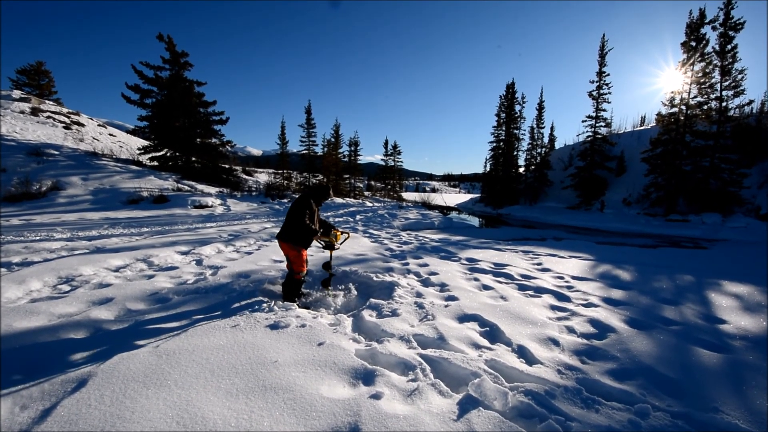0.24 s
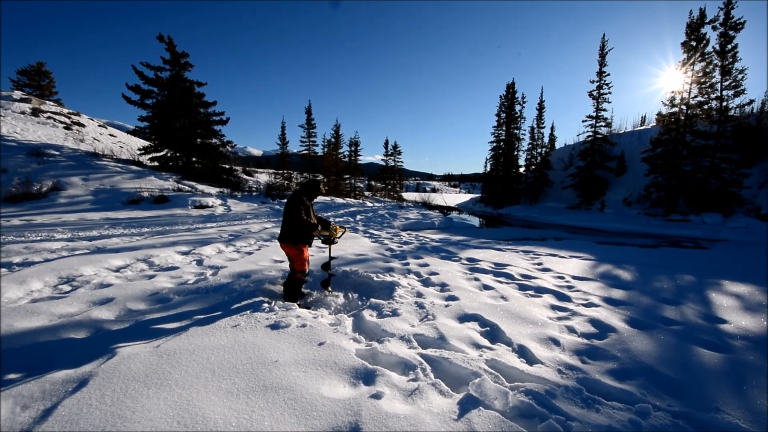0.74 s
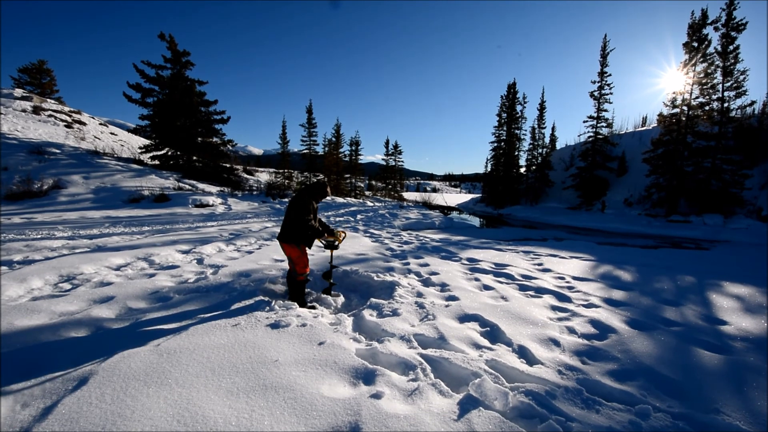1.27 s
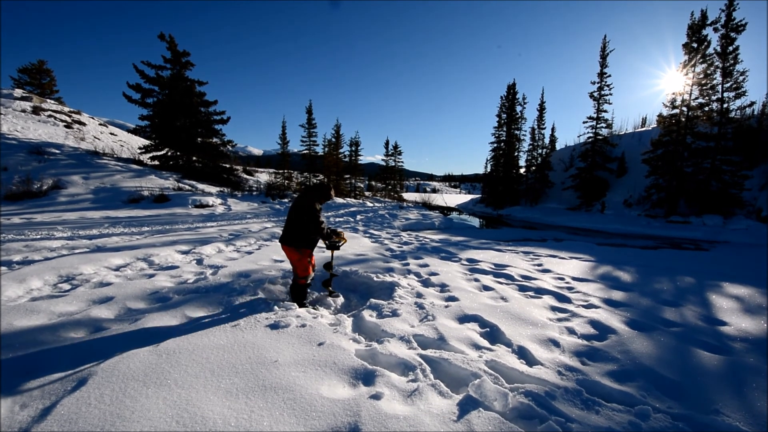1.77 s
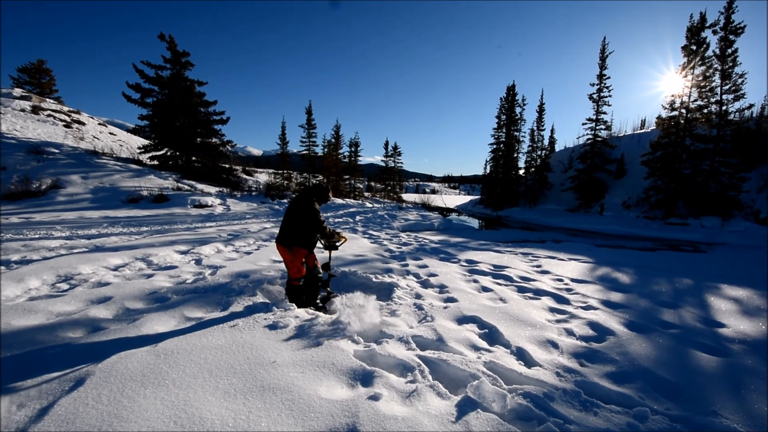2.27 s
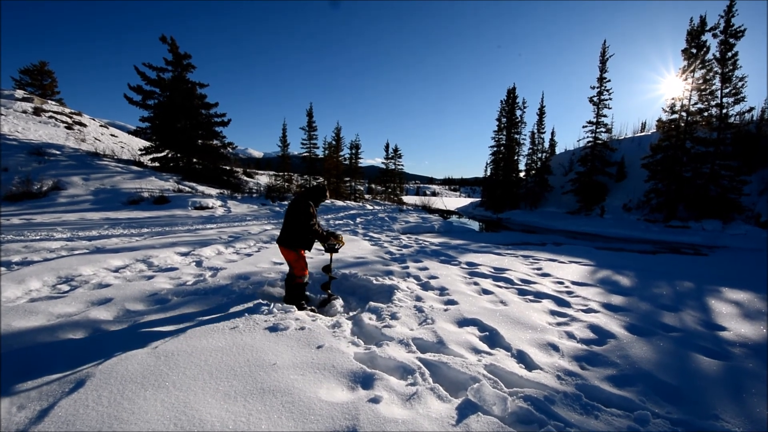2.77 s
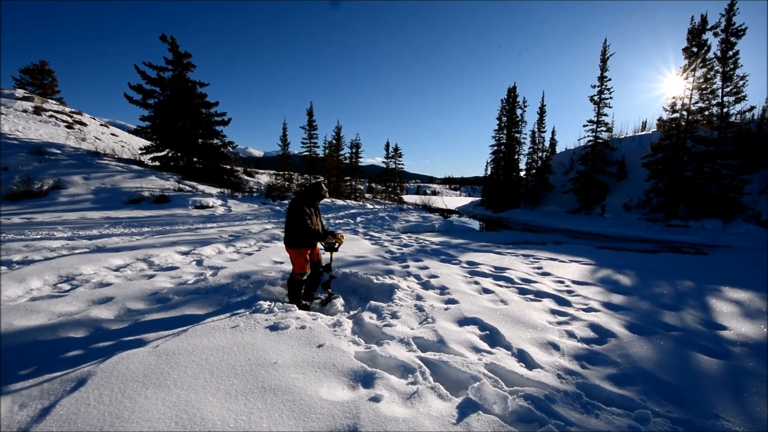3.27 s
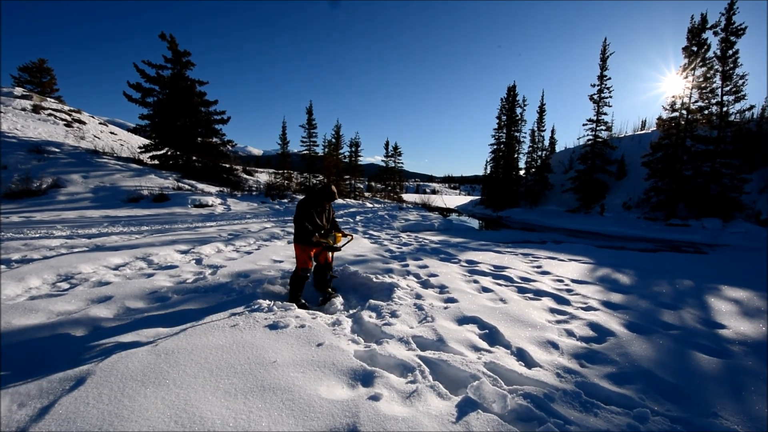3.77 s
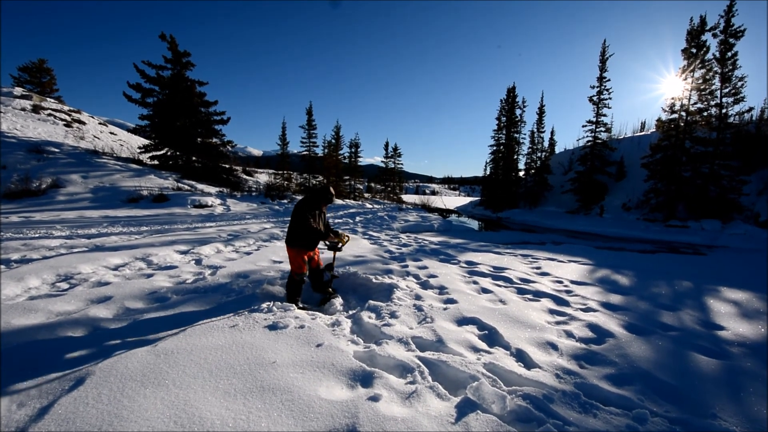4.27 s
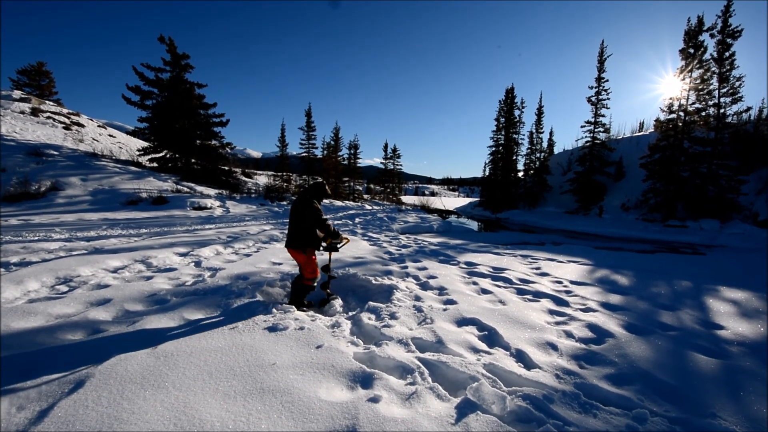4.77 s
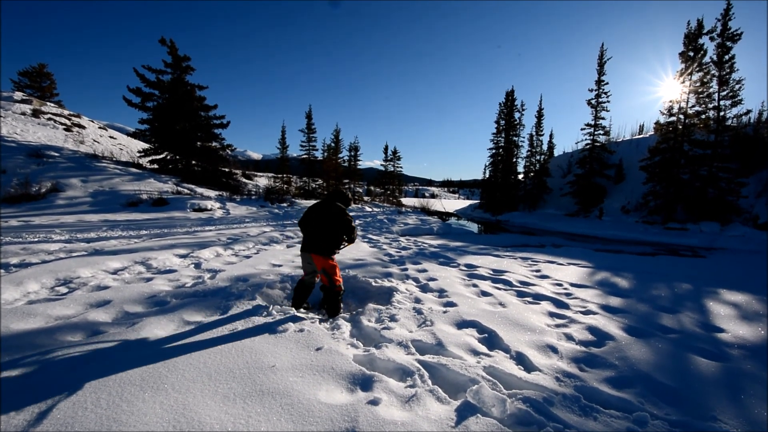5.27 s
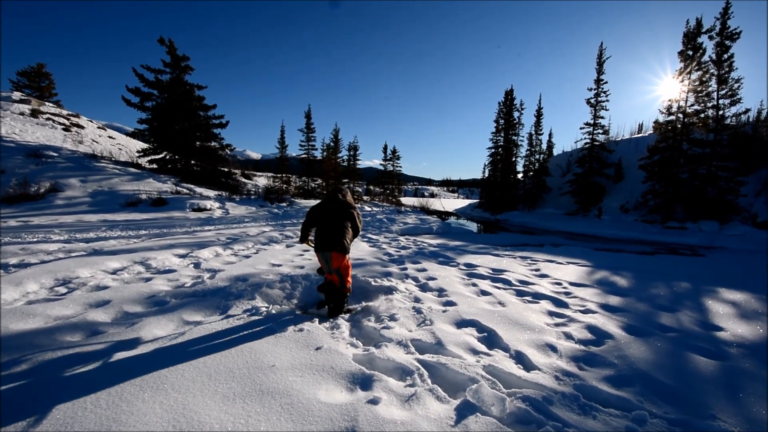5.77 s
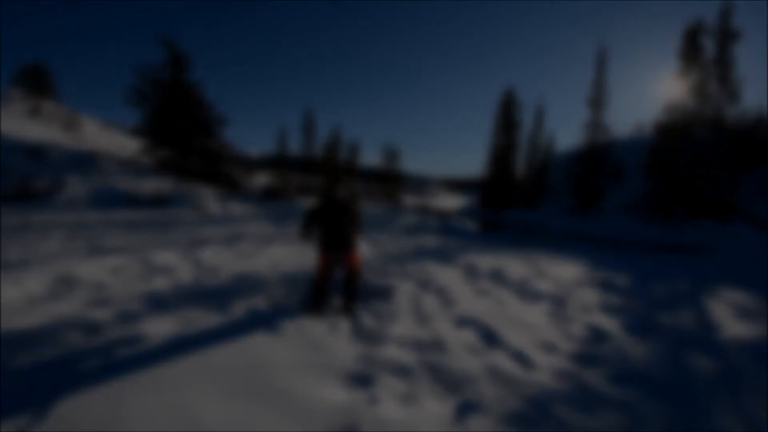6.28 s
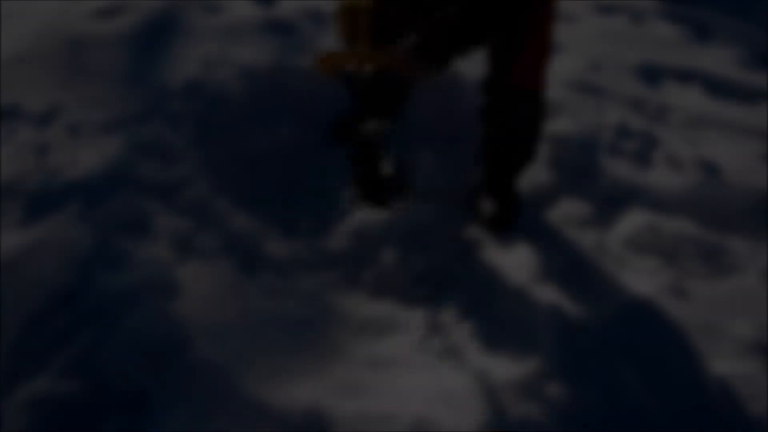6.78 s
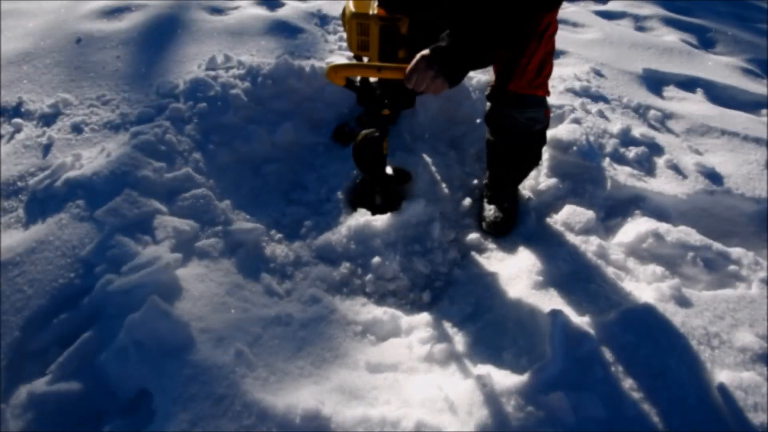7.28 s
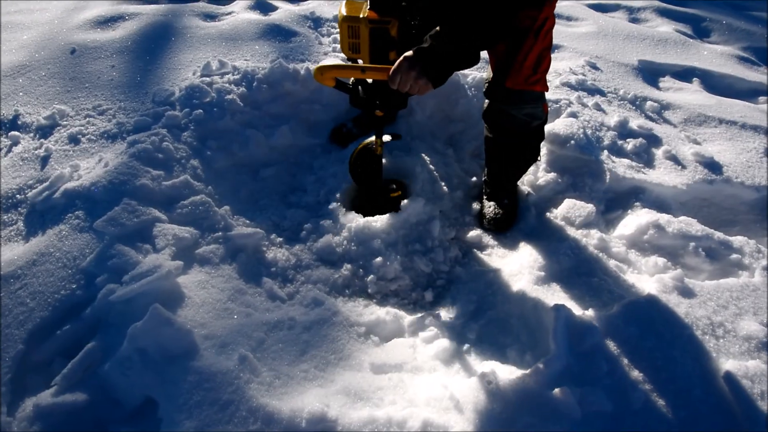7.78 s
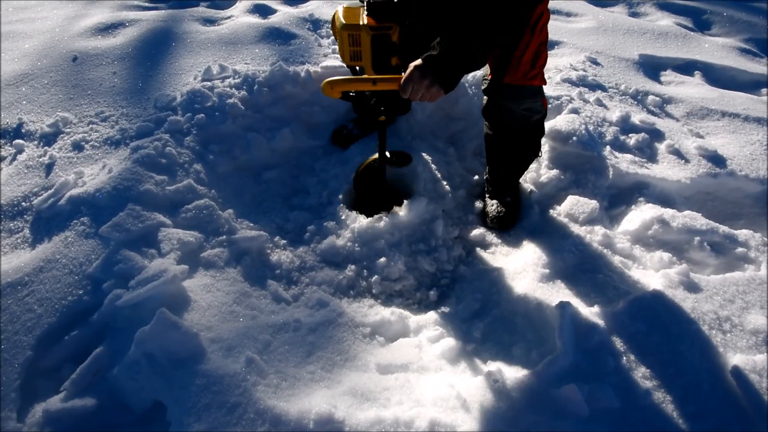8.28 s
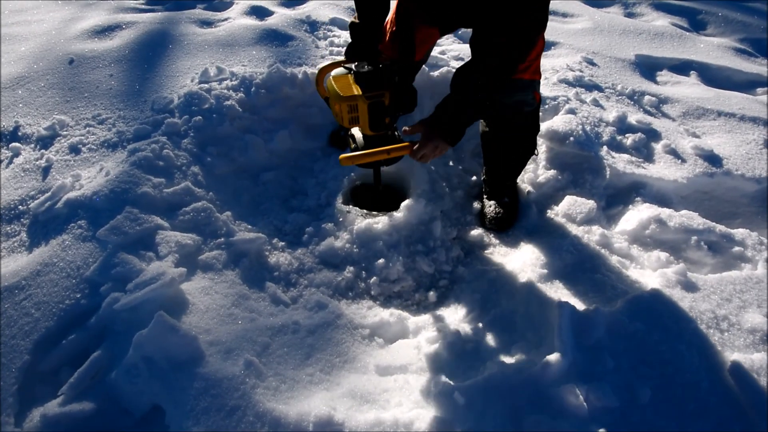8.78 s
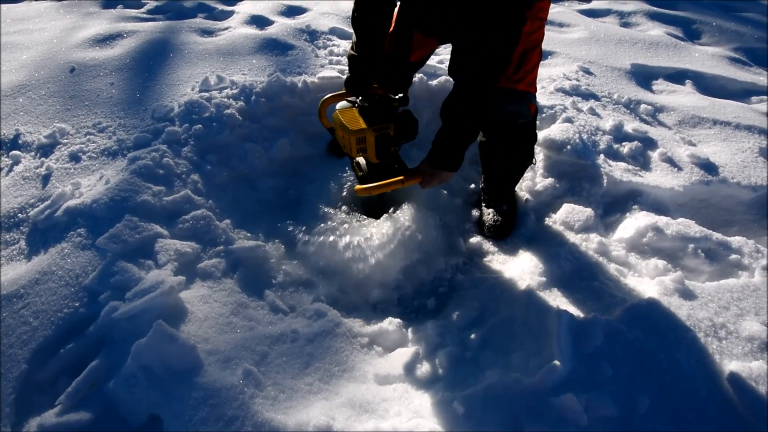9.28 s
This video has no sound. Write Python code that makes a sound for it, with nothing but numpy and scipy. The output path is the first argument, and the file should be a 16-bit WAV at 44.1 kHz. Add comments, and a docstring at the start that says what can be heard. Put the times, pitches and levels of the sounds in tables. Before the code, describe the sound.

A small two-stroke ice auger runs some metres away on a frozen lake, with no echo. It revs to a peak at about 0.3 seconds, then winds down, its exhaust and gear whine falling. From 1.3 seconds it idles unevenly with sharp irregular pops and a metallic knock; a loose cover clanks between 2.6 and 5 seconds. Around 5 seconds the sound turns duller and quieter. At about 6 seconds it dips and fades back in from close by, with hard pops, a thin clutch ring and short bursts of chipping ice. At 6.6 seconds the throttle opens and the engine buzzes loudly under load while the blade scrapes with a hiss. The pitch sags until 8 seconds, recovers, and climbs to a high rev near 8.7 seconds. The engine then runs down, with a few pops and ice chips around 9.5 seconds.

```python
"""A two-stroke ice auger on a frozen lake, where snow gives no echo. First, some metres away, it revs and
runs down, exhaust pulses and gear whine falling with the crank speed. It then idles, firing every few
turns, while piston slap rings the cylinder and a loose cover clanks; the driller steps in front and
screens it. Next, from close by, the slipping clutch rings and the blade scrapes and chips the ice as it
bores under load. Last, the engine revs free and runs down."""
import sys
import numpy as np
from scipy import signal
from scipy.fft import rfft, irfft
from scipy.io import wavfile
from scipy.ndimage import uniform_filter1d, map_coordinates

SR = 44100
rng = np.random.default_rng(int(sys.argv[2]) if len(sys.argv) > 2 else 0)


def file_out(sig):
    """Save sig as 16-bit WAV at sys.argv[1]."""
    # one column per channel
    cols = np.atleast_2d(sig).T
    # limit, then scale
    lim = np.clip(cols, -1, 1)
    pcm = np.round(lim * 32767).astype(np.int16)
    wavfile.write(sys.argv[1], SR, pcm)


N = 420273
TIME_S = np.arange(N) / SR


def undb(db):
    """Amplitude ratio of a level in decibels."""
    return 10 ** (np.asarray(db) / 20)


def unit(x):
    """Normalisation to rms 1."""
    return x / np.sqrt(np.mean(x ** 2))


def curve(table):
    """Linear interpolation of (time_s, value) rows at every sample."""
    return np.interp(TIME_S, *np.transpose(table))


def walk(rate_hz):
    """Low-pass random fluctuation with a spread near 1."""
    hold = int(SR / rate_hz)
    steps = np.repeat(rng.standard_normal(N // hold + 1), hold)
    return 1.3 * uniform_filter1d(uniform_filter1d(steps, hold), hold)[:N]


def colour(x, outline, size=4096):
    """Minimum-phase filter through (frequency_hz, gain_db) rows, by folding the cepstrum."""
    hz, db = np.transpose(outline)
    bins_hz = np.maximum(np.fft.rfftfreq(size, 1 / SR), 1)
    cepstrum = irfft(np.log(undb(np.interp(np.log(bins_hz), np.log(hz), db))))
    cepstrum[1:size // 2] *= 2
    cepstrum[size // 2 + 1:] = 0
    return signal.fftconvolve(x, irfft(np.exp(rfft(cepstrum))))[:N]


def ring(x, modes):
    """Superposition of damped resonances, given as (pitch_hz, width_hz, gain_db) rows."""
    return sum(undb(db) * signal.lfilter(*signal.iirpeak(hz, hz / width, fs=SR), x)
               for hz, width, db in modes)


def steep_ring(x, hz, width, db):
    """Two equal resonators in cascade give steeper skirts; the gain applies once."""
    return ring(ring(x, [(hz, width, 0)]), [(hz, width, db)])


def clicks(times, sizes):
    """Impulse train, each impulse shared between two samples."""
    place = np.clip(times * SR, 0, N + 1)
    i = place.astype(int)
    before = np.bincount(i, sizes * (1 - place + i), N + 3)
    after = np.bincount(i + 1, sizes * (place - i), N + 3)
    return (before + after)[:N]


def fade(x, decay_s):
    """Exponential decay after every impulse."""
    return signal.lfilter([1], [1, -np.exp(-1 / (decay_s * SR))], x)


def kicks(fired, decay_s):
    """Impulse response of the crank: each lone firing gives a jolt that dies away."""
    return uniform_filter1d(fade(clicks(fired, 1), decay_s), size=100)


def strokes(turns, scatter_db, jitter_s, angle=0):
    """Quasi-periodic impacts: one a turn at the given crank angle, uneven in size and time."""
    timing, strength = rng.standard_normal((1000, 2)).T
    never_s = 2 * N / SR
    times = np.interp(np.arange(1000) + angle, turns, TIME_S, left=never_s, right=never_s)
    return clicks(times + jitter_s * timing, undb(scatter_db * strength))


def rattle(turns, hz, jitter_s, count):
    """Impacts across clearances: loose parts strike at their own slowly creeping crank angles."""
    angles = (np.arange(count) + rng.random(count)) / count
    creep = .01 * np.cumsum(rng.standard_normal((count, 1000)), axis=1)
    blows = sum(rng.choice([-1, 1]) * strokes(turns, 1.5, jitter_s, angle)
                for angle in angles[:, None] + creep)
    return unit(blows / np.sqrt(hz))


def throb(turns, hz, decay_s, floor, scatter_db, angle=0):
    """Amplitude modulation of mean power 1: one burst a turn, running together at speed."""
    bursts = fade(strokes(turns, scatter_db, .0012, angle), decay_s) + floor * (hz / 60) ** 2
    bursts = uniform_filter1d(bursts, size=90)
    return bursts / np.sqrt(uniform_filter1d(bursts ** 2, size=8000))


CLOSE_S, FADE_IN_S = 5.9, .32  # the listening point moves close, and the engine fades in
# Crank speed, heard from afar and from close by: time_s, speed_hz
FAR_SPEED = [(0.0, 99.7), (0.14, 115.6), (0.28, 124.4), (0.46, 114.7), (0.78, 91.16), (1.22, 70.54),
             (1.43, 64.23), (2.12, 61.5), (2.21, 59.2), (3.23, 54.85), (4.43, 56.65), (4.64, 52.3),
             (5.2, 54.05), (5.49, 50.5), (5.89, 49.4)]
NEAR_SPEED = [(5.9, 90.9), (6.18, 67.6), (6.24, 73.6), (6.62, 73.3), (6.76, 96.7), (6.9, 99.4), (7.0, 93.6),
              (7.08, 93.4), (7.18, 89.4), (7.3, 87.5), (7.34, 88.6), (7.42, 86.6), (7.48, 87.5),
              (7.78, 76.5), (7.96, 75.3), (8.06, 77.3), (8.22, 86.5), (8.36, 85.6), (8.5, 104.0),
              (8.6, 115.8), (8.7, 122.6), (8.79, 123.4), (8.9, 110.3), (9.12, 87.3), (9.4, 67.6),
              (9.53, 65.2)]
def crank_speed():
    """Rotation rate sets the fundamental; close by, the load of the biting blade makes it wobble."""
    wobble = 1 + .008 * walk(13)
    return np.where(TIME_S < CLOSE_S, curve(FAR_SPEED), curve(NEAR_SPEED) * wobble)


def crank_angle(hz, fired):
    """Flywheel inertia: the crank leaps at each lone firing, then coasts. Angle in turns."""
    jolt = kicks(fired, .092)
    lurching_hz = hz * (1 + .045 * (jolt - uniform_filter1d(jolt, size=6000)))
    turns = np.cumsum(lurching_hz) / SR
    lead = np.unwrap(np.interp(fired, TIME_S, turns) % 1, period=1)
    return turns - np.interp(TIME_S, fired, lead)  # each firing falls at the top of a stroke


# Squeezes of the throttle: open_s, shut_s, opening_fraction, decay_s
SQUEEZES = [(-0.3, 0.04, 1, .11), (5.9, 6.15, .55, .1), (6.62, 8.73, 1, .03)]
def throttle_opening(attack_s=.03):
    """First-order lag: the opening rises and falls exponentially with each squeeze."""
    return np.max([opening * (1 - np.exp(-np.maximum(TIME_S - open_s, 0) / attack_s))
                   * np.exp(-np.maximum(TIME_S - shut_s, 0) / decay_s)
                   for open_s, shut_s, opening, decay_s in SQUEEZES], axis=0)


# Each *_LEVEL row below gives a part's level when idling afar, then what each condition adds:
# idle_db, clutch_db, per_octave_db, throttle_db, close_db, screened_db
def level_law(hz, throttle, clutch_hz=64.14):
    """Gains multiply, so decibels add: returns the rule that turns a *_LEVEL row into dB over time."""
    engaged = .5 + .5 * np.tanh((hz - clutch_hz) / 2.64)
    octaves = np.log2(np.maximum(hz / clutch_hz, 1))
    close = TIME_S >= CLOSE_S
    screened = np.clip(.5 + (TIME_S - 4.985) / .89, 0, 1) * ~close  # the driller steps in front
    fade_db = -14.5 * close * np.clip(1 - (TIME_S - CLOSE_S) / FADE_IN_S, 0, 1)
    conditions = np.array([np.ones(N), engaged, octaves, throttle, close, screened])
    return lambda row: np.dot(row, conditions) + fade_db


NOTE_LEVEL = (-32, 0, -3, 0, -4.5, 0)
# Muffler response under throttle: frequency_hz, gain_db
DRIVEN_MUFFLER = [(170, -26), (225, -3), (270, 1), (330, -1), (470, 3), (570, -12), (700, -15)]
def exhaust_note(turns, hz, throttle, level, lug_hz=80):
    """Periodic firing gives a harmonic series: the third leads, higher ones swell as the engine lugs."""
    uneven = turns + .007 * walk(70)
    lugging_db = 15 * np.log2(lug_hz / hz)
    note, power = 0, 0
    for k in range(2, 11):
        muffler_db = np.interp(k * hz, *np.transpose(DRIVEN_MUFFLER))
        gain = undb(muffler_db + 4 * (k == 3) + lugging_db * (k > 3))
        note += gain * undb(2 * walk(25)) * np.sin(2 * np.pi * (k * uneven + rng.random()))
        power += gain ** 2 / 2
    return note / np.sqrt(power) * throttle * undb(level(NOTE_LEVEL))


SOFT_FIRING_LEVEL = (-36.5, -25, 0, 2, 5, -10)
# The hardest lone firings with the throttle shut: start_s, level_db
HARD_IGNITIONS = [(1.2988, -23), (1.359, -31), (1.8979, -28), (2.0102, -27), (2.0903, -27.5), (2.4455, -34),
                  (2.7274, -29), (2.7958, -27), (2.8661, -28), (2.9912, -29), (3.1356, -28.5),
                  (3.208, -28.5), (3.2807, -33), (3.4445, -35), (3.6258, -28.5), (3.8081, -28),
                  (3.935, -27.5), (4.1344, -24.5), (4.2984, -26.5), (4.3886, -28.5), (4.629, -29),
                  (5.1185, -29), (5.2127, -31.5), (5.307, -36.5), (5.401, -42), (5.479, -46), (5.615, -41),
                  (5.692, -39), (5.771, -42), (6.2153, -29), (6.284, -17), (6.3978, -17.5), (6.464, -16),
                  (6.54, -18), (9.3821, -18), (9.4409, -21), (9.5011, -16.5)]
def lone_firings(hz, level, every_turns=4.3, below_hz=66, scatter_db=6.5):
    """Intermittent combustion: at low speed soft firings fall between hard ones. Times and levels."""
    soft_db = level(SOFT_FIRING_LEVEL)
    turns = np.cumsum(hz) / SR
    hard_turns = np.interp(np.array(HARD_IGNITIONS)[:, 0], TIME_S, turns)
    chance = iter(rng.standard_normal((300, 2)))
    rows = list(HARD_IGNITIONS)
    for start, end in zip(hard_turns, hard_turns[1:]):
        gap = round(end - start)
        count = max(round(gap / every_turns), 1)
        for turn in np.linspace(0, gap, count, endpoint=False)[1:]:
            timing, strength = next(chance)
            i = np.searchsorted(turns, start + (end - start) * round(turn + .35 * timing) / gap)
            if hz[i] < below_hz:
                rows.append((TIME_S[i], soft_db[i] + scatter_db * strength))
    return np.array(sorted(rows)).T


# Spectrum of a firing's crack: frequency_hz, gain_db
CRACK_SPECTRUM = [(30, -66), (300, 9), (900, 1), (2300, 10.5), (4500, -2.5), (8500, 2.5), (15000, -5)]
def firing_cracks(fired, fired_db):
    """A brief pressure pulse has a broad spectrum: each lone firing is a sharp burst of noise."""
    bursts = uniform_filter1d(fade(clicks(fired + .0006, undb(fired_db)), .0042), size=70)
    return undb(-2.5) * colour(bursts * rng.standard_normal(N), CRACK_SPECTRUM)


THUD_LEVEL = (-48, 0, 0, 0, 14, 8)
# Broad resonance of the muffler: pitch_hz, width_hz, gain_db
MUFFLER_MODES = [(450, 270, 0)]
def firing_thuds(fired, level):
    """Heavy damping: the muffler answers each lone firing with a dull thud."""
    thuds = ring(ring(clicks(fired, 1), MUFFLER_MODES), MUFFLER_MODES)
    return thuds / np.max(np.abs(thuds)) * undb(level(THUD_LEVEL))


PUFF_LEVEL, GROWL_LEVEL = (-52, 1.5, -11.5, -7, -10.5, -2.5), (-76.5, 14.5, -24, -1, 26.5, 13)
# Muffler response to puffs: frequency_hz, gain_db
PUFF_SPECTRUM = [(25, -47), (58, -9.5), (110, -5.5), (170, -14.5), (225, -3.5), (280, -2), (330, 6.5),
                 (390, -3), (480, -1.5), (900, -24.5), (2000, -71)]
# Resonances of the outlet: pitch_hz, width_hz, gain_db
GROWL_MODES = [(215, 60, -7), (345, 110, 0), (445, 110, -1)]
def exhaust_puffs(turns, hz, level):
    """Source and filter: the piston pumps a puff a turn through the muffler, and the outlet growls."""
    puffs = unit(strokes(turns, 1.5, .00015) / np.sqrt(hz)) + .7 * rng.standard_normal(N)
    muffled = unit(colour(puffs, PUFF_SPECTRUM))
    growl = unit(sum(steep_ring(puffs, *mode) for mode in GROWL_MODES))
    return muffled * undb(level(PUFF_LEVEL)) + growl * undb(level(GROWL_LEVEL))


KNOCK_LEVEL = (-35.4, -7.5, -14, -6, -12, -20)
# Wavering of the knock: time_s, gain_db
KNOCK_WAVER = [(1.4, 3.5), (2.6, -3.5), (3.3, -3), (3.8, -10.5), (4.2, -3.5), (4.7, -3.5), (4.95, 6),
               (5.2, 5.5), (5.4, 0)]
# Cylinder resonances, passed twice: pitch_hz, width_hz, gain_per_pass_db
KNOCK_MODES = [(1372, 115, 10), (1715, 90, 6.5), (2340, 300, -9)]
def piston_knock(turns, level):
    """Impact excitation: the piston slaps once a turn; the ring swells as it spreads into the fins."""
    slap = strokes(turns, scatter_db=.8, jitter_s=.00003)
    scuff = fade(slap, .002) * rng.standard_normal(N)
    blow = unit(slap) + .25 * unit(scuff)
    cylinder = sum(ring(ring(blow, [mode]), [mode]) for mode in KNOCK_MODES)
    return unit(cylinder) * undb(level(KNOCK_LEVEL) + curve(KNOCK_WAVER))


PINION_TEETH, GEAR_LEVEL = 8, (-54.5, 6, 4, 7, 9, -12)
# Response of the gear case: frequency_hz, gain_db
GEARCASE_SPECTRUM = [(450, -5), (610, 1), (850, -7), (980, 2), (1080, -7), (1220, 3), (1500, 1),
                     (1800, -10), (2120, 3), (2480, -2), (3050, -7), (3300, -20)]
def gear_whine(turns, level):
    """Tooth-mesh harmonics, modulated in amplitude by tooth load and in phase by backlash."""
    mesh = PINION_TEETH * turns + .02 * walk(90) + .09 * walk(22)
    whine = 0
    for k in range(1, 5):
        backlash = (.05 + .035 * k) * walk(150)
        load = undb(2.7 * walk(16) + 3.3 * walk(150))
        whine += load * np.sin(2 * np.pi * (k * mesh + backlash + rng.random()))
    swell = 1 + .55 * np.cos(2 * np.pi * turns + 1)
    return unit(colour(whine * swell, GEARCASE_SPECTRUM)) * undb(level(GEAR_LEVEL))


HOUSING_LEVEL, CLATTER_LEVEL = (-50, 16.5, -1.5, .5, 0, -5.5), (-40, 9.5, 2.5, 0, -.5, -10)
# Responses of the housing and of the thin metal covers: frequency_hz, gain_db
HOUSING_SPECTRUM = [(30, -35), (150, -21), (250, -11), (450, -11.5), (620, -4), (1000, 0.5), (1300, 0.5),
                    (2200, -15.5)]
CLATTER_SPECTRUM = [(60, -109), (600, -29), (1000, -10.5), (1300, 0.5), (1900, -.5), (2300, 2.5),
                    (2800, -3.5), (3300, -5), (3900, -8.5), (4700, -18), (7000, -57)]
def casing_clatter(turns, hz, level):
    """Structure-borne sound: small blows and gas noise shake the housing and its covers."""
    low = rattle(turns, hz, jitter_s=.00029, count=14) + rng.standard_normal(N)
    low *= throb(turns, hz, decay_s=.02, floor=.8, scatter_db=3.5)
    high = rattle(turns, hz, jitter_s=.00004, count=24) + .8 * rng.standard_normal(N)
    high *= throb(turns, hz, decay_s=.0036, floor=.33, scatter_db=1.5)
    housing = unit(colour(low, HOUSING_SPECTRUM)) * undb(level(HOUSING_LEVEL))
    covers = unit(colour(high, CLATTER_SPECTRUM)) * undb(level(CLATTER_LEVEL))
    return housing + covers


HISS_LEVEL = (-52.5, 11.5, -1.5, 3, 5.5, -10)
# Wavering of the hiss: time_s, gain_db
HISS_WAVER = [(0, -2), (.3, 5), (.9, -2), (1.6, 4), (3.3, 0.5), (3.9, 8.5), (4.7, -2.5), (5.2, 2), (5.9, 1)]
# Spectrum of the hiss, shared by the ice chips: frequency_hz, gain_db
HISS_SPECTRUM = [(2350, -13.5), (4000, -3), (7480, -2), (10100, -1), (11300, -7.5), (13200, -4),
                 (15500, -8.5)]
def intake_hiss(turns, hz, fired, level):
    """Flow noise: the intake hisses ahead of each stroke and surges with jolts while the clutch slips."""
    breaths = throb(turns, hz, decay_s=.0039, floor=.33, scatter_db=2, angle=-.32)
    gas = rng.standard_normal(N) * breaths * undb(.99 * walk(300))
    slipping = np.exp(-((hz - 69) / 7) ** 2)
    surge = 1 + slipping * (1.2 * kicks(fired, .06) - .4)
    return unit(colour(gas, HISS_SPECTRUM)) * surge * undb(level(HISS_LEVEL) + curve(HISS_WAVER))


SING_LEVEL = (-43, 7, 0, -12, 3, 0)
# Drill resonances, passed twice: pitch_hz, width_hz, gain_per_pass_db
SING_MODES = [(570, 130, -3), (1530, 190, 3)]
def coasting_drill(turns, hz, level, sing_hz=86, spread_hz=9.5):
    """Swept resonance: slack teeth chatter, and their whine glides through the modes of the drill."""
    teeth = sum(np.sin(2 * np.pi * (k * PINION_TEETH * turns + .17 * walk(110))) for k in (1, 2))
    chatter = teeth + 3 * rattle(turns, hz, jitter_s=.00004, count=20)
    slack = np.exp(-((hz - sing_hz) / spread_hz) ** 2 / 2)
    return slack * unit(ring(ring(chatter, SING_MODES), SING_MODES)) * undb(level(SING_LEVEL))


GRAZE_HZ, GRAZE_SPREAD_HZ = 70.7, 7.2  # crank speeds at which the shoes graze the drum
SHOE_LEVEL = (-43, 5, 10, 1, 5.5, -8)
# Resonances of the clutch drum: pitch_hz, width_hz, gain_db
DRUM_MODES = [(6900, 1000, -1), (10480, 680, 1.5), (9500, 7000, -4.5)]
def clutch_shoes(turns, hz, fired, level):
    """Friction excitation: near engagement each jolt throws the shoes against the drum, which rings."""
    touch = np.exp(-((hz - GRAZE_HZ) / GRAZE_SPREAD_HZ) ** 2)
    pressure = .2 + 1.2 * kicks(fired, .043)
    graze = rng.standard_normal(N) * throb(turns, hz, decay_s=.004, floor=.12, scatter_db=2)
    drum = sum(steep_ring(graze, *mode) * undb(3 * walk(30)) for mode in DRUM_MODES)
    return touch * pressure * unit(drum) * undb(level(SHOE_LEVEL))


# Resonances of the blade: pitch_hz, width_hz, gain_db
SCRAPE_MODES = [(4990, 620, 5), (6140, 450, 7), (7340, 420, 6), (9550, 420, -3)]
def blade_scrape(hz, far_db=-52, closer_db=9.5):
    """Sliding friction on ice excites the blade's modes, which drift and swell as the contact shifts."""
    friction = rng.standard_normal(N) * undb(3 * walk(400))
    blade = 0
    for mode in SCRAPE_MODES:
        drift = np.arange(N) + np.cumsum(.018 * walk(4))
        ringing = map_coordinates(steep_ring(friction, *mode), [drift], mode="mirror")
        blade += ringing * undb(3.5 * walk(5))
    turning = .5 + .5 * np.tanh((hz - GRAZE_HZ) / GRAZE_SPREAD_HZ)
    closeness = np.clip((TIME_S - CLOSE_S) / FADE_IN_S, 0, 1)
    return unit(blade) * turning * undb(far_db + closer_db * closeness)


# The blade catches in the ice: start_s, level_db
BLADE_CATCHES = [(6.298, -25), (6.484, -24), (6.498, -19), (6.555, -21), (6.64, -21), (9.353, -26),
                 (9.471, -27)]
def ice_chips():
    """Brittle fracture: each catch chips the ice in a short broadband burst."""
    times, db = np.transpose(BLADE_CATCHES)
    bursts = uniform_filter1d(fade(clicks(times, undb(db)), decay_s=.008), size=90)
    return bursts * unit(colour(rng.standard_normal(N), HISS_SPECTRUM))


# Blows of the loose cover at idle: start_s, level_db
COVER_BLOWS = [(2.603, -36), (2.726, -30), (2.936, -33), (3.316, -31), (3.352, -35), (3.388, -28),
               (3.445, -32), (3.479, -31), (3.499, -27), (3.553, -32), (3.935, -39), (4.297, -28),
               (4.388, -36), (4.571, -32.5), (4.708, -43), (4.95, -38)]
# Resonances of the cover: pitch_hz, width_hz, gain_db
CLANK_MODES = [(1760, 120, 9), (2030, 220, -10), (2420, 160, 10.5), (2760, 260, -11), (3280, 220, -2),
               (3760, 160, -20)]
def cover_clanks():
    """Damped plate vibration: the loose cover strikes the housing and rings briefly."""
    times, db = np.transpose(COVER_BLOWS)
    blows = fade(clicks(times, undb(db)), decay_s=.003) * rng.standard_normal(N)
    return undb(7.5) * ring(blows, CLANK_MODES)


SHAKE_LEVEL = (-57, 5.5, -7, 5, -1, -7)
def casing_shake(turns, hz, level):
    """Unbalance: the crank shakes the casing once a turn and the piston twice, far harder at speed."""
    crank = np.sin(2 * np.pi * turns)
    piston = (hz / 100) ** 2 * np.sin(4 * np.pi * turns)
    return (crank + piston) * (hz / 100) ** 3.2 * undb(walk(22) + level(SHAKE_LEVEL))


def scene():
    """Superposition: the parts of the auger, driven by one crank, add up alike in both channels."""
    hz = crank_speed()
    throttle = throttle_opening()
    level = level_law(hz, throttle)
    fired, fired_db = lone_firings(hz, level)
    turns = crank_angle(hz, fired)
    exhaust = exhaust_puffs(turns, hz, level) + exhaust_note(turns, hz, throttle, level)
    firings = firing_cracks(fired, fired_db) + firing_thuds(fired, level)
    metal = gear_whine(turns, level) + piston_knock(turns, level)
    casing = casing_clatter(turns, hz, level) + casing_shake(turns, hz, level)
    drill = coasting_drill(turns, hz, level) + clutch_shoes(turns, hz, fired, level) + blade_scrape(hz)
    impacts = cover_clanks() + ice_chips()
    auger = exhaust + firings + metal + casing + drill + impacts + intake_hiss(turns, hz, fired, level)
    return np.array([auger, auger])


def record(dry, bass_hz=48, top_hz=15850):
    """Band limiting and soft saturation thin the deep bass, round the peaks and cut the top."""
    thinned = signal.sosfilt(signal.butter(2, bass_hz, "high", fs=SR, output="sos"), dry)
    rounded = np.tanh(3 * thinned) / 3
    return signal.sosfilt(signal.ellip(10, .2, 80, top_hz, fs=SR, output="sos"), rounded)


dry = scene()
out = record(dry)
file_out(out)
```